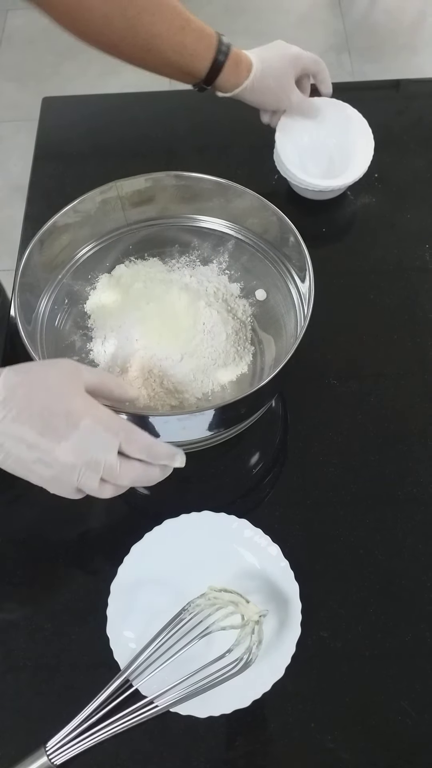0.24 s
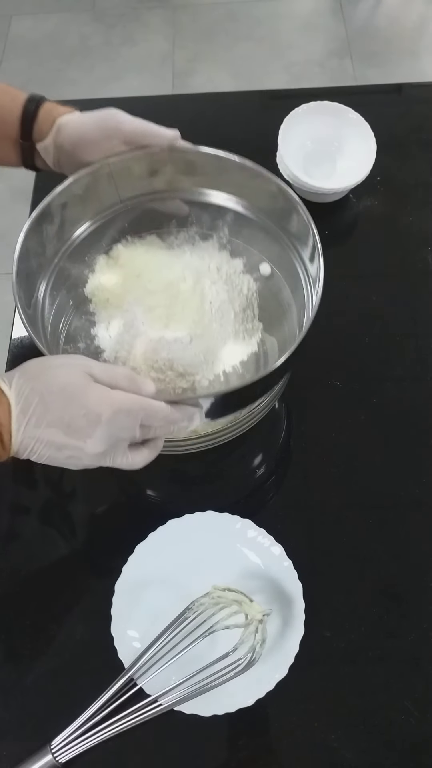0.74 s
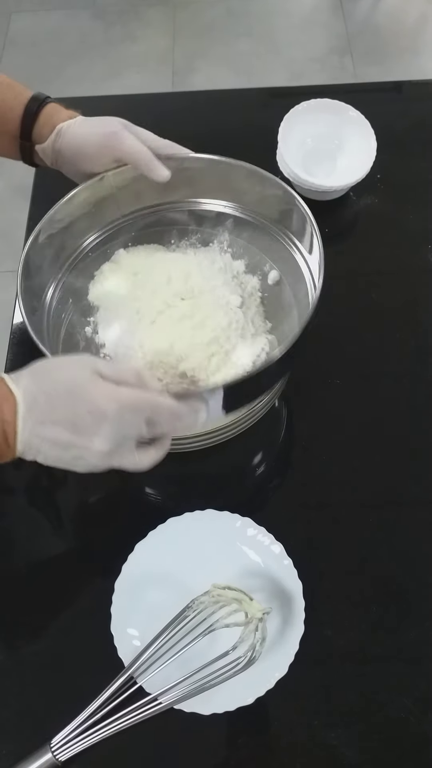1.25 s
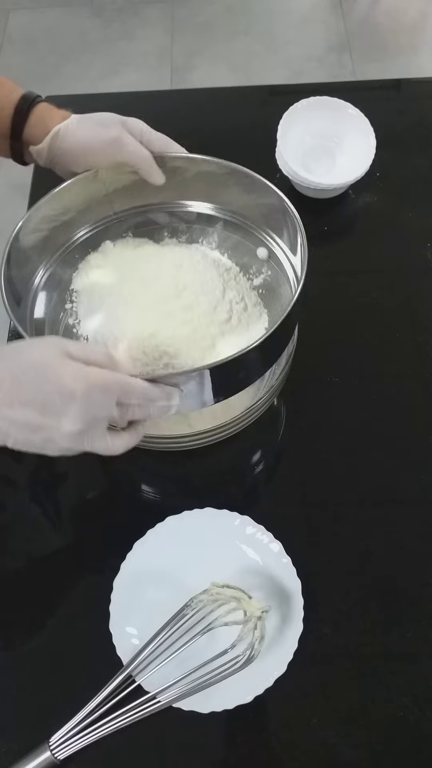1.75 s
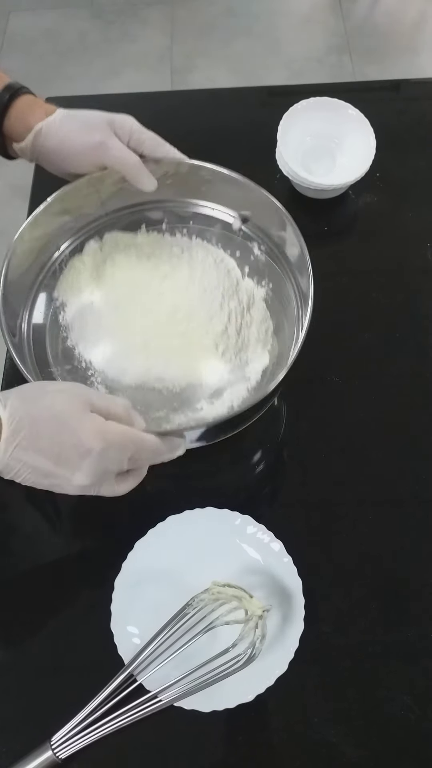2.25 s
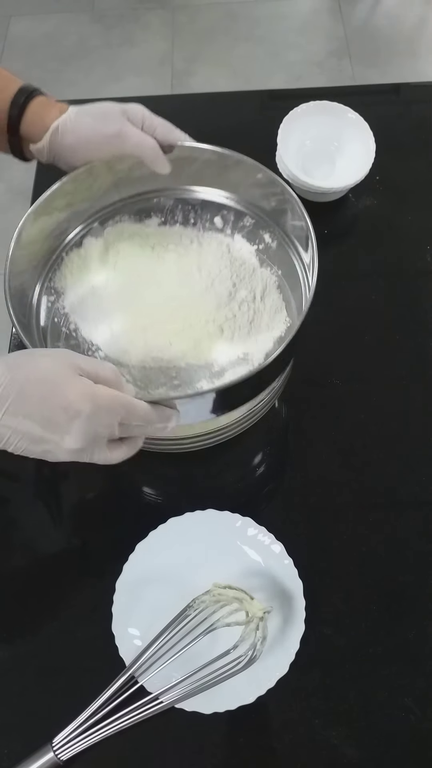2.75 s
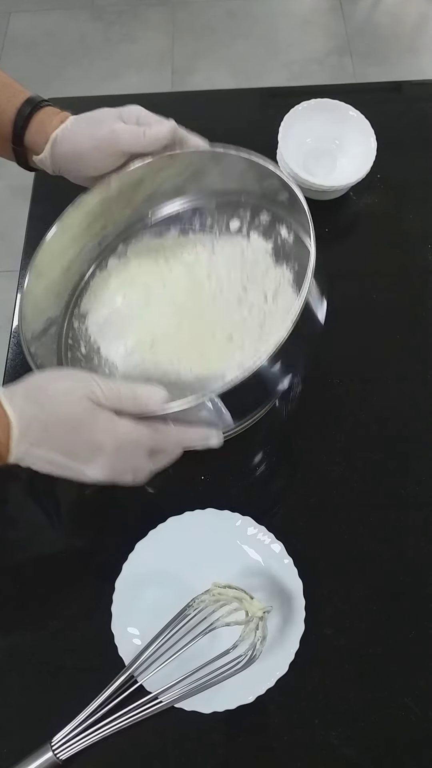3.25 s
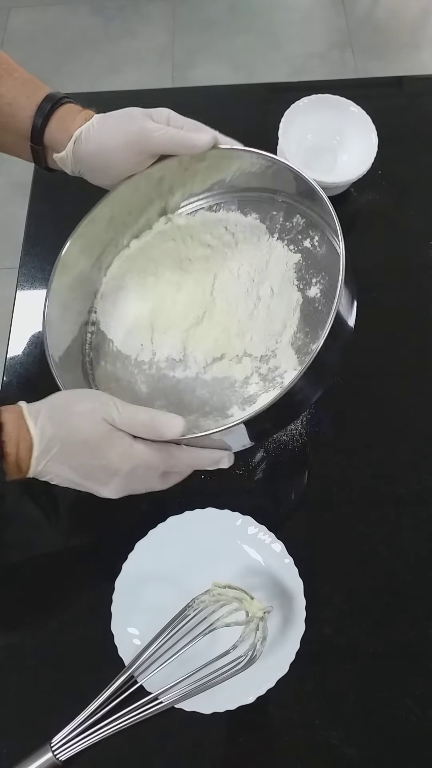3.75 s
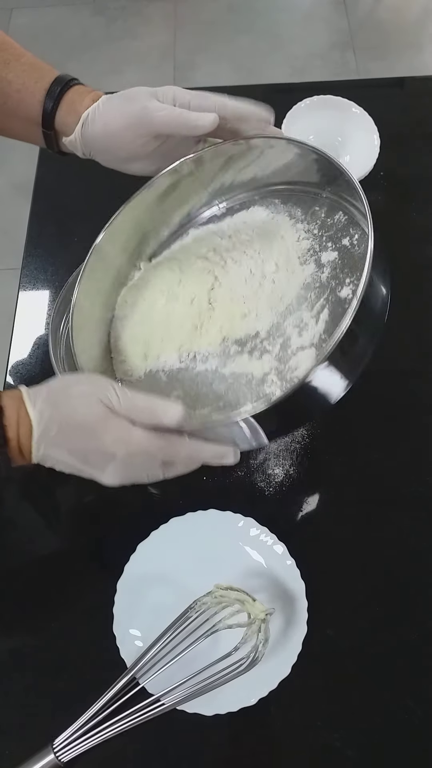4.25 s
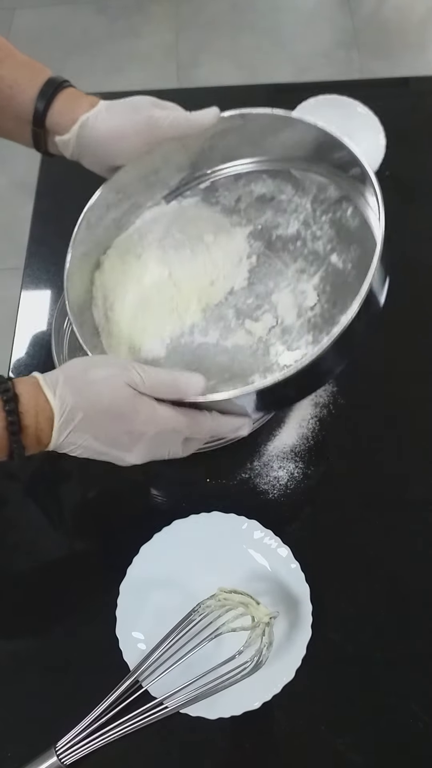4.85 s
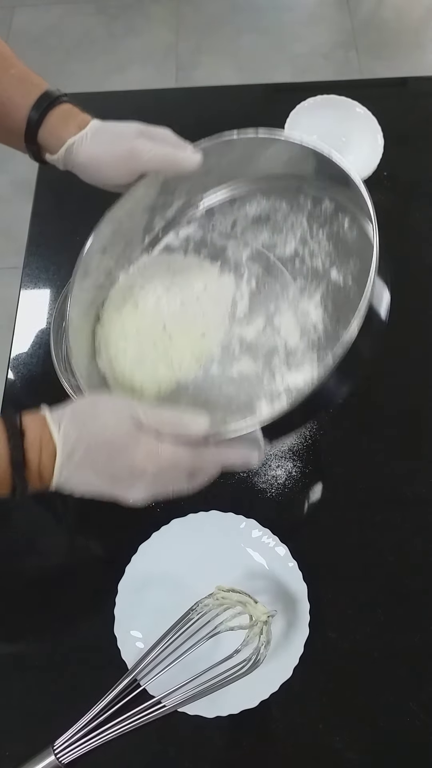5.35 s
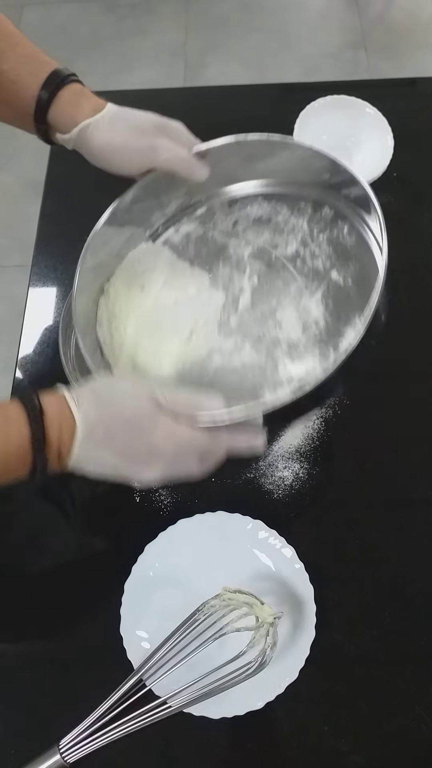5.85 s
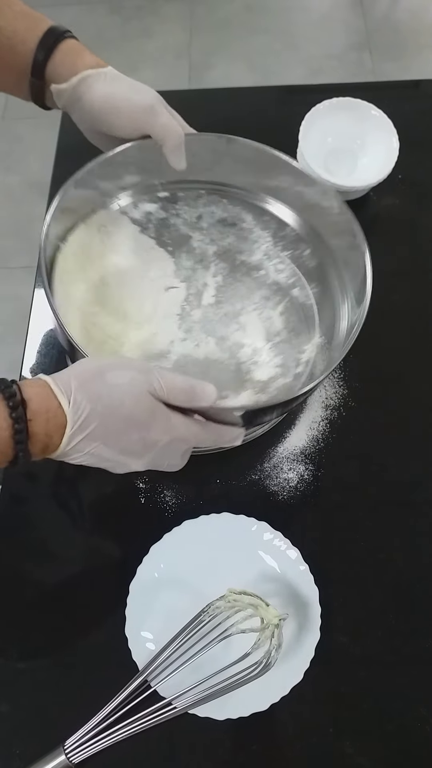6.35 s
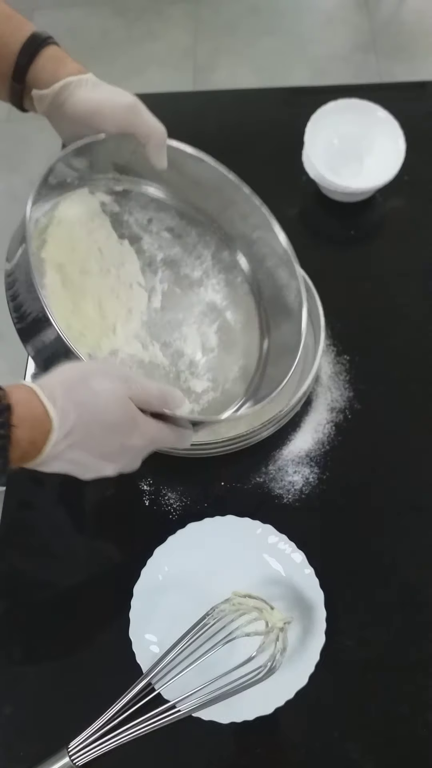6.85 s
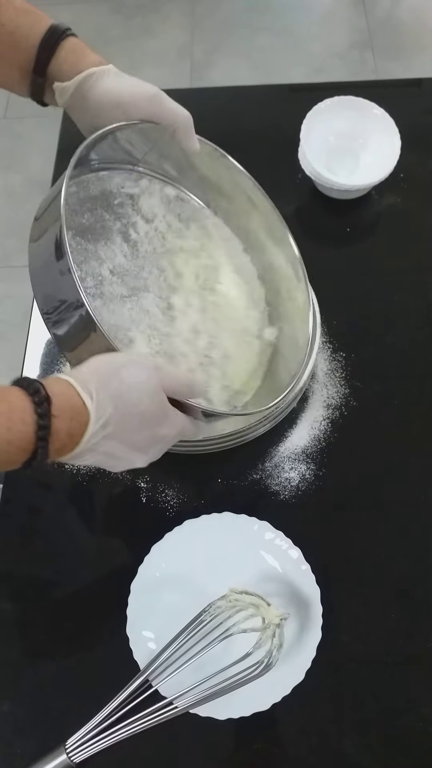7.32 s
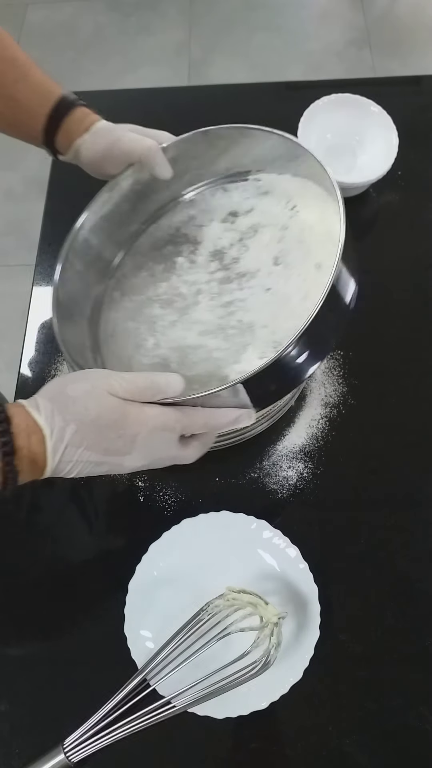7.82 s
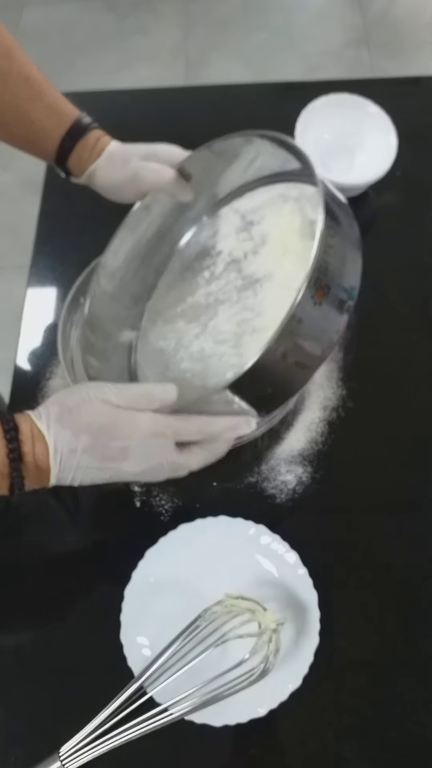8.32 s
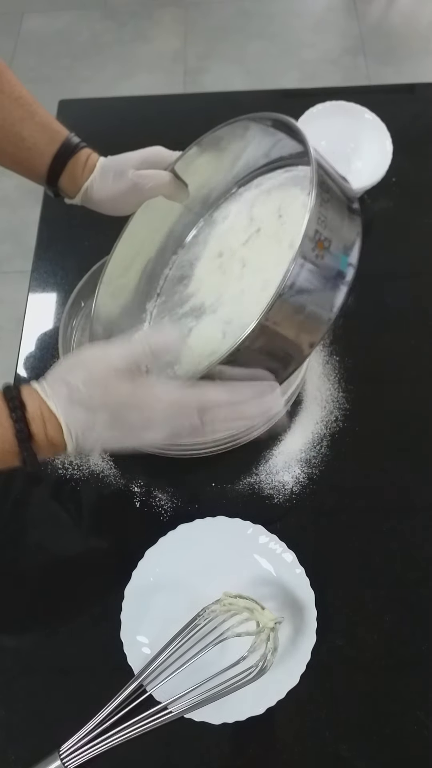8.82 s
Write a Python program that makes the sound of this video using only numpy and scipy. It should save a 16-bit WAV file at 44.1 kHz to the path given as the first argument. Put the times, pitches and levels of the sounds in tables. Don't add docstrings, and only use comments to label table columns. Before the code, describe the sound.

A small hard-walled kitchen, heard from about arm's length, with a faint low motor hum throughout. At 0.1 s the sieve clinks dully on the steel bowl; a glove rubs the rim until about 0.9 s, and a soft low clunk comes at 1.2 s. From 1.5 to 5 s powder swishes and hisses across fine mesh in quiet, irregular shakes with tiny dry flicks and ticks. From 5.3 to 6 s the shakes form an even, quick run, about eight a second. Around 6.5 s the rim chatters lightly in the fingers. At 7.04 and 7.11 s two loud, bright clangs ring the bowl, leaving a low swing; a smaller rim knock follows at 7.3 s. Light taps and a crisp slap come near 7.8 s, powder trickles, a knock lands at 8.4 s, then three hard metallic slaps at 8.7, 8.86 and 9.0 s.

```python
import sys
import numpy as np
from scipy import signal
from scipy.io import wavfile
from scipy.ndimage import uniform_filter1d

SR = 44100
rng = np.random.default_rng(int(sys.argv[2]) if len(sys.argv) > 2 else 0)


def file_out(sig):
    cols = np.atleast_2d(sig).T
    lim = np.clip(cols, -1, 1)
    pcm = np.round(lim * 32767).astype(np.int16)
    wavfile.write(sys.argv[1], SR, pcm)


def boost(x):
    u = np.asarray(x, float) / 20
    return 10 ** u


N = 400428

# hz, level_db (per Hz)
MESH_COLOUR = [(820, -28), (1400, -16), (1500, -18), (1730, -7), (2520, -9), (3340, 1), (3730, -6.5),
               (4480, -1), (5110, -5.5), (6710, -0.5), (9470, -18), (12400, -4.5), (15700, -1.5)]
# hz, level_db (per Hz)
WALL_COLOUR = [(350, -40), (600, -14.5), (824, -17.5), (1010, -11.5), (1160, -16), (1810, -10),
               (2590, -6.5), (3360, 0.5), (5230, -4), (6000, 0), (6890, -1), (7600, -9.5), (8300, -10),
               (9200, -7.5), (15600, 2), (16600, -22)]
QUIET_EDGE_HZ = 15850


def evened(x):
    return x / np.sqrt(np.mean(x ** 2) + 1e-20)


def read(points, hz):
    f, value = np.transpose(points)
    return np.interp(np.log(hz + 1), np.log(f + 1), value)


def add(mix, s, sound):
    part = mix[round(s * SR):][:len(sound)]
    part += sound[:len(part)]


def seconds(length_s):
    return np.arange(round(length_s * SR)) / SR


def coloured(x, gain_db):
    hz = abs(np.fft.fftfreq(4096, 1 / SR))
    log_gain = np.log(boost(np.maximum(gain_db(hz), -100)))
    taps = np.fft.ifft(np.exp(np.conj(signal.hilbert(log_gain)))).real[:2048]
    return signal.oaconvolve(x, taps)[:len(x)]


def resonate(x, hz, width):
    r = np.exp(-np.pi * width / SR)
    return 2 * signal.lfilter([1 - r], [1, -r * np.exp(2j * np.pi * hz / SR)], x).real


def drift(rate):
    steps = uniform_filter1d(rng.standard_normal(400), 3)
    return evened(np.interp(np.arange(N) / SR * rate, np.arange(400), steps))


def kitchen(x):
    # hz, t60_s
    decay = [(100, 0.99), (500, 0.62), (2000, 0.51), (3500, 0.36), (5000, 0.21), (9000, 0.13),
             (16000, 0.15)]
    taps = np.zeros(SR)
    at = np.arange(260, SR - 20, 12)
    at = at + rng.integers(0, 12, len(at))
    taps[at] = rng.choice([-1., 1.], at.shape)
    hz, t, z = signal.stft(taps, SR, nperseg=256)
    dying = boost(-60 * t / read(decay, hz)[:, None])
    tail = signal.istft(z * dying, SR, nperseg=256)[1]
    return signal.fftconvolve(x, tail / np.linalg.norm(tail))[:N]


def cooler():
    # hz, level_db (rms), waver_db
    motor = [(84.7, -69, -4), (175.3, -51.5, 0), (348.6, -58.5, 2), (528, -68.5, 2)]
    # hz, width_hz, level_db (rms)
    panels = [(346.9, 10.3, -59.5), (277, 6.3, -62), (206.3, 8.5, -72), (442.7, 11, -67.5),
              (498, 6.2, -68.5), (653.7, 16.6, -69.5), (2800, 160, -73.5), (3400, 250, -75.5)]
    # hz, level_db (per Hz)
    air_colour = [(25, -57), (68, -18.5), (130, -15.5), (220, -11), (350, -8.5), (420, -16.5), (650, -21.5),
                  (1150, -27.5), (1500, -38.5), (2300, -43), (3000, -37), (6900, -36.5), (8800, -49),
                  (12000, -39.5)]
    # time_s, gain_db
    held = [(0, -10), (.22, -8), (.4, 0), (7.0, -2), (7.2, -2.5), (8.3, -2), (8.6, -1.5)]
    t = np.arange(N) / SR
    orders, case = np.zeros((2, N))
    for hz, db, waver in motor:
        tone = np.sqrt(2) * np.sin(2 * np.pi * (hz * t + rng.random()))
        orders += boost(db + waver * drift(13)) * tone
    for hz, width, db in panels:
        stirred = resonate(resonate(rng.standard_normal(N), hz, width), hz, 2 * width)
        case += boost(db + 0.55 * drift(5.5)) * evened(stirred)
    air = evened(coloured(rng.standard_normal(N), lambda hz: read(air_colour, hz)))
    return boost(np.interp(t, *np.transpose(held))) * orders + case + boost(-54.5) * air


def slide(rows):
    # hz, level_db (per Hz)
    glove_colour = [(240, -38), (400, 7.5), (587, -1), (644, 4.5), (695, -4), (975, 2.5), (1230, -1.5),
                    (1800, 3.5), (2230, 2), (3430, 3.5), (6750, -8.5), (8760, -29), (15700, -8.5)]
    s, level_db, bright_db = np.transpose(rows)
    t = np.arange(s[0], s[-1], 1 / SR)
    rub = evened(coloured(rng.standard_normal(len(t)), lambda hz: read(glove_colour, hz)))
    dull = signal.lfilter(*signal.butter(2, 2200, fs=SR), rub)
    bright = boost(np.interp(t, s, bright_db))
    return s[0], boost(np.interp(t, s, level_db)) * (dull / bright + (rub - dull) * bright)


def glove_slides():
    # time_s, level_db, brightness_db (bright half up, dull half down)
    slides = [
        [(0.0, -45.5, -8), (0.062, -50.5, -6.5), (0.084, -43.5, -6), (0.16, -46.5, -3.5), (0.224, -42, -0.5),
         (0.306, -53, 0), (0.42, -68, 4.5)],
        [(0.5, -68, 1), (0.536, -53.5, -2.5), (0.6, -39, 2.5), (0.68, -42.5, 10.5), (0.752, -41.5, 5),
         (1.02, -77.5, 6.5)],
    ]
    glove = np.zeros(N)
    for rows in slides:
        add(glove, *slide(rows))
    return glove


def tick(s, peak_db, note_hz, fizz_db, ms=2.9):
    t = seconds(.04)
    click = coloured(rng.standard_normal(len(t)) * np.exp(-t / 0.00045),
                     lambda hz: read(MESH_COLOUR, hz) + 6 * (hz > 9000))
    scratch = 1 + 3.1 * uniform_filter1d(rng.standard_normal(len(t)), size=24)
    pair = np.sin(2 * np.pi * note_hz * t) + 0.46 * np.sin(2 * np.pi * 1.19 * note_hz * t)
    note = scratch * pair * np.exp(-t / (ms / 1000)) * (1 - np.exp(-t / 0.00025))
    return s, boost(peak_db) * (note + boost(fizz_db) * click / abs(click).max())


def chatter(s, peak_db, fizz_db):
    note_hz, ring_db, ring_s = 4600, -13, .009
    t = seconds(.1)
    ring = boost(peak_db + ring_db) * np.sin(2 * np.pi * note_hz * t) * np.exp(-t / ring_s)
    add(ring, 0, tick(s, peak_db, note_hz, fizz_db, ms=3.6)[1])
    return s, ring


def fingertips():
    # time_s, peak_db, note_hz, fizz_db
    ticks = [(.078, -43, 3400, 5), (.568, -47, 5500, 4), (1.163, -47, 2800, -20), (1.207, -48, 3750, -3),
             (1.296, -61, 6570, 22), (2.668, -47.5, 12800, 17), (2.668, -47, 5250, 13),
             (2.689, -40, 13100, 10), (3.422, -54, 4070, 8), (4.09, -47, 5000, 3), (4.117, -42, 3400, 5),
             (4.43, -52, 2980, 8), (6.386, -56, 11900, 22), (6.555, -34.5, 5500, -20),
             (7.015, -47, 1890, 4), (7.109, -15, 2080, 6), (7.108, -34, 14800, 0), (7.326, -38, 4600, -10),
             (7.616, -46, 2800, 1), (7.822, -41, 14500, 4), (7.835, -24, 14600, -5), (7.846, -34, 14800, 0),
             (7.934, -47, 13500, 2), (8.482, -47, 13500, 5), (8.665, -55, 12700, 8)]
    # time_s, peak_db, fizz_db
    chatters = [(6.456, -50, 26), (6.476, -44, 10), (6.52, -48, 8), (6.554, -37, 12), (6.595, -54, -5),
                (6.639, -43.5, -1), (6.766, -46, 4), (6.987, -56, 0), (7.021, -41.5, 15)]
    tips = np.zeros(N)
    for row in ticks:
        add(tips, *tick(*row))
    for row in chatters:
        add(tips, *chatter(*row))
    return tips


def slap(s, peak_db, note_hz, note_db, fizz_db):
    t = seconds(.5)
    noise = rng.standard_normal((2, len(t))) * (1 - np.exp(-t / 0.0017))
    grip = boost(2.04 * evened(uniform_filter1d(rng.standard_normal(len(t)), size=60)))
    contact = grip * np.exp(-t / 0.0038) + boost(-17.0 - 60 * t / 0.45)

    def wall_db(hz):
        note = note_db / (1 + ((hz - note_hz) / 900) ** 4)
        return read(WALL_COLOUR, hz) + note - 20 * (hz > 9000)

    def fizz_colour_db(hz):
        return read(WALL_COLOUR, hz) - 40 * (hz < 9000) - 5 * (hz < 10300)

    wall = coloured(noise[0] * contact, wall_db)
    fizz = coloured(noise[1] * (np.exp(-t / 0.0011) + boost(-28.5 - 60 * t / 0.35)), fizz_colour_db)
    push = np.sin(2 * np.pi * 110 * t) * np.exp(-t / 0.006)
    push += 1.2 * np.sin(2 * np.pi * 450 * t) * np.exp(-t / 0.003)
    thud = boost(-19.5) * (push - uniform_filter1d(push, 700))
    body = wall / abs(wall).max() + boost(fizz_db + 3) * fizz / abs(fizz).max() + thud
    return s, boost(peak_db - 1.5) * body


def palm_slaps():
    # time_s, peak_db, note_hz, note_db, fizz_db
    slaps = [(6.554, -38, 4800, -18, 10), (7.8245, -27, 5880, 14, -22), (7.831, -23.5, 7240, 13.5, -10),
             (7.838, -24, 5830, 20, -2), (8.1953, -39.5, 7000, 4, 13.5), (8.2811, -31, 3150, -2, -17),
             (8.3691, -20, 3000, 4.5, -17), (8.3758, -28.5, 3100, 5, -17), (8.512, -37.5, 3270, 2, -8),
             (8.518, -40, 3330, -1, -15), (8.6962, -13, 5960, 1, -3), (8.8597, -12, 3300, 0, -5),
             (9.0111, -15, 3520, -4, -9.5)]
    palm = np.zeros(N)
    for row in slaps:
        add(palm, *slap(*row))
    return palm


def belly(s, level_db):
    hz, t60_s, rise_s = 134.6, 1.55, 0.053
    t = seconds(1.8)
    return s, boost(level_db - 60 * t / t60_s) * np.sin(2 * np.pi * hz * t) * (1 - np.exp(-t / rise_s))


def clang(modes, s, ring_db, best_hz, reach, crack_db):
    t = seconds(.8)
    hz, db, t60 = np.transpose(modes)[:, :, None]

    def wander():
        knots = rng.standard_normal((len(hz), 80))
        return np.array([np.interp(t, np.linspace(0, .8, 80), k) for k in knots])

    level = 1 + .3 * wander()
    phase = .5 * hz / (hz + 1800) * wander()
    share_db = -6 * (np.log2(hz / best_hz) / reach) ** 2
    dying = boost(db + share_db - 10.5 - 60 * t / t60)
    ring = (dying * level * np.sin(2 * np.pi * hz * t + phase)).sum(0)
    ring *= 1 - np.exp(-t * (reach + 0.53) / 0.0016)

    def crack_colour_db(f):
        away = abs(np.log2((f + 50) / best_hz)) / reach
        return read(WALL_COLOUR, f) - 9 * away - 5 * (f > 8000)

    rattle = rng.standard_normal(len(t)) * (boost(-60 * t / 0.014) + boost(-17 - 60 * t / 0.43))
    crack = coloured(rattle * (1 - np.exp(-t * (reach + 0.14) / 0.002)), crack_colour_db)
    return s, boost(ring_db) * ring + boost(crack_db) * crack / abs(crack).max()


def struck_metal():
    low_hz, top_hz, fine_hz = [176, 395, 340, 427, 466, 523, 568, 590, 787, 840, 923, 1003, 1142, 1262,
                               1796, 1814, 1840], [2100, 2643, 2940, 3440, 3656, 3680, 4480, 5640, 6900, 7120], [619, 759, 1200, 1350, 2234, 2821, 3149,
                                                                     3962, 4247, 4790, 5103, 5303, 6050,
                                                                     6627, 7424, 7693, 10500, 12200, 14100]
    # level_db, t60_s
    main_ring, fine_ring = [(-3.5, 0.78), (-9.5, 0.88), (-10, 0.37), (-3.5, 0.65), (1, 0.57), (5.5, 0.077),
                            (6.5, 0.22), (-11.5, 0.23), (-12, 0.54), (-16, 0.63), (-11.5, 0.49),
                            (-11, 0.22), (-4.5, 0.13), (-12.5, 0.31), (-5.5, 0.44), (-3, 0.26), (-4, 0.18),
                            (-5, 0.18), (3, 0.074), (-3, 0.12), (2, 0.078), (2, 0.27), (-1, 0.121),
                            (-17, 0.3), (-3.5, 0.16), (-4, 0.23), (-10, 0.11)], [(-12.5, 0.35), (-9, 0.4), (-10, 0.17), (-8.5, 0.23), (-15, 0.12),
                                          (-13.5, 0.206), (-21, .3), (-18, 0.15), (-23, 0.2), (-10.5, 0.41),
                                          (-15, 0.21), (-11, 0.12), (-19, 0.22), (-19, .15), (-10, .2),
                                          (-2, 0.24), (-13, 0.17), (-3, 0.16), (-4, .2)]
    rim_hz = [1066, 1295, 1512, 1667, 1717, 1740, 2445, 2575, 3036, 3205, 3300, 4370, 4540]
    # level_db, t60_s
    rim_ring = [(-1, 0.17), (-17, 0.2), (6.5, 0.096), (-5.5, 0.4), (-4, 0.38), (2.5, 0.34), (-33, 0.43),
                (-8.5, 0.18), (-7, 0.2), (4.5, 0.097), (-4, 0.17), (-23, 0.22), (-26, 0.31)]
    # time_s, ring_db, best_hz, reach_octaves, crack_db
    clangs = [(.003, -57, 6950, 0.37, -55), (.066, -22.5, 800, 0.32, -31.5), (.085, -28, 940, 0.41, -37),
              (.14, -59, 497, 0.61, -53), (1.169, -31.5, 485, 0.28, -39.5), (1.173, -35.5, 1130, 0.49, -42),
              (7.04, -10, 1270, 1.86, -8.5), (7.062, -20, 1070, 0.45, -10), (7.108, -8.5, 1370, 2.1, -4.5),
              (7.135, -21, 990, 2, -35), (7.288, -27, 3600, .15, -45), (7.713, -36, 800, 0.44, -35),
              (7.719, -33.5, 1100, 0.77, -31.5), (7.745, -52, 1500, 0.73, -39)]
    # time_s, ring_db, best_hz, reach_octaves, crack_db
    rim_hits = [(0.002, -42.5, 2010, 2.3, -61.5), (3.419, -60, 1810, 0.39, -51),
                (7.287, -19.5, 1860, 1.2, -21), (8.283, -40, 3600, 0.72, -58),
                (8.37, -25.5, 2950, 0.41, -31), (8.372, -37, 1380, 0.22, -41),
                (8.513, -41, 3200, 0.56, -60), (8.699, -27, 3300, 0.71, -35), (8.86, -34, 3300, 0.85, -46),
                (9.014, -34, 3300, 0.71, -38)]
    # time_s, level_db
    belly_blows = [
        (1.17, -43.5),
        (7.04, -25),
    ]
    bowl = np.column_stack([low_hz + top_hz + fine_hz, main_ring + fine_ring])
    rim = np.column_stack([rim_hz, rim_ring])
    metal = np.zeros(N)
    for row in clangs:
        add(metal, *clang(bowl, *row))
    for row in rim_hits:
        add(metal, *clang(rim, *row))
    for row in belly_blows:
        add(metal, *belly(*row))
    return metal


def surge(rows, t):
    rise_share, fall_share = 0.38, 0.44
    s, flow_db, length = np.transpose(rows)[:3, :, None]
    late = (t - s) / length
    return flow_db - 6 * np.where(late < 0, (late / rise_share) ** 2, abs(late) / fall_share)


def run_of_shakes():
    run_db = [-59, -54.5, -51.5, -51.5, -52.5, -52]
    start_s, period_s, length_s = 5.362, .1258, 0.11
    return [(start_s + k * period_s, db, length_s, 16 - k) for k, db in enumerate(run_db)]


def flow():
    # peak_s, flow_db, length_s, coarseness_db (towards 2 kHz)
    shakes = [(.46, -58.5, .12, 18), (.55, -54.5, 0.17, 0), (1.17, -59, 0.14, 0), (1.84, -56, 0.15, 21),
              (1.92, -56, 0.046, 19), (2.04, -50, 0.088, 12), (2.322, -50, .055, 12),
              (2.44, -58, 0.16, 20.5), (2.65, -52, 0.096, 13), (2.735, -50, 0.16, 15.5),
              (3.428, -49.5, 0.033, 14), (3.47, -56.5, 0.092, 22.5), (3.62, -60, 0.053, 20),
              (4.05, -50, 0.062, -2), (4.11, -51, 0.065, 15), (4.185, -50, 0.096, 13),
              (4.44, -52.5, 0.091, 13), (4.6, -61, 0.15, 21.5), (5.23, -49.5, 0.079, -2),
              (6.15, -59.5, 0.052, -6), (6.58, -51, 0.088, -15), (6.66, -53.5, 0.062, 0),
              (6.78, -55, 0.029, 0), (6.93, -67, .1, 24)]
    # peak_s, flow_db
    flicks = [(1.05, -66), (1.3, -64), (1.47, -60), (1.64, -71), (1.73, -62), (2.88, -66), (3.04, -65),
              (3.197, -60), (3.214, -58), (3.26, -61), (3.34, -63), (3.37, -57.5), (3.74, -55.5),
              (3.82, -64), (3.88, -56), (3.93, -56), (3.99, -54.5), (4.27, -61), (4.5, -55.5), (5.075, -61),
              (6.34, -62), (8.08, -67)]
    # time_s, flow_db, coarseness_db
    trickle = [(.9, -83, -11), (1.25, -67.5, 14), (2.1, -60, 11), (2.2, -67, 11), (2.8, -66.5, 4),
               (4.2, -59, -3), (4.7, -84, 2), (5.15, -87, 0), (5.3, -59.5, 13), (6.05, -60, 8),
               (6.3, -63.5, -10), (7.03, -57.5, 3.5), (7.5, -64, -11), (7.62, -60, 30.5), (8.12, -73, -10),
               (8.2, -56.5, -8), (8.45, -54.5, 0), (8.65, -62.5, -3)]
    flick_s = 0.041
    t = np.arange(0, N / SR, .002)
    rows = shakes + run_of_shakes()
    shake_db = surge(rows, t)
    coarse_db = np.transpose(rows)[3][:, None]
    flick = (boost(surge([(s, db, flick_s) for s, db in flicks], t)) ** 2).sum(0)
    at, thin_db, grit_db = np.transpose(trickle)
    thin_db = np.interp(t, at, thin_db)
    grit_db = np.interp(t, at, grit_db)
    fine = (boost(shake_db) ** 2).sum(0) + boost(thin_db) ** 2 + flick
    coarse = (boost(shake_db + coarse_db) ** 2).sum(0) + boost(thin_db + grit_db) ** 2
    return [np.interp(np.arange(N) / SR, t, np.sqrt(power)) for power in (fine, coarse, flick)]


def powder():
    ping_hz, ping_width_hz, grains_per_s = 6260, 1900, 12000
    sizes = boost(1.7 * np.minimum(rng.exponential(1, (2, N)), 4))
    grains = rng.standard_normal((2, N)) * sizes * (rng.random((2, N)) < grains_per_s / SR)
    fine = evened(coloured(grains[0], lambda hz: read(MESH_COLOUR, hz) - 30 * (hz < 1200)))
    lumps = evened(resonate(resonate(grains[1], 2030, 2400), 2030, 2400))
    pings = evened(resonate(resonate(grains[1], ping_hz, ping_width_hz), ping_hz, ping_width_hz))
    dust, grit, flick = flow()
    unrest = boost(.7 * drift(40))
    return unrest * (boost(1.0) * dust * fine + boost(-28.0) * grit * lumps + boost(-6) * flick * pings)


def scene():
    sift, hum, glove = powder(), cooler(), glove_slides()
    metal, palm, tips = struck_metal(), palm_slaps(), fingertips()
    blows = boost(-8) * metal + boost(-9) * palm + boost(-9) * tips
    sent = blows + boost(-12.5) * glove + boost(-10.0) * sift
    echo = kitchen(coloured(sent, lambda hz: -11 * (hz > 9000) - 8 * (hz < 160)))
    steady = coloured(glove + sift + echo + hum, lambda hz: -50 * (hz > QUIET_EDGE_HZ))
    near = signal.sosfilt(signal.butter(4, 70, "high", fs=SR, output="sos"), metal + palm + tips)
    return (near + steady)[None]


def halved_top(x):
    gate_db = -57
    low_pass = signal.firwin(1023, QUIET_EDGE_HZ - 60, window=("kaiser", 8), fs=SR)[None]
    top = x - signal.oaconvolve(x, low_pass, "same")
    level_db = 10 * np.log10(abs(uniform_filter1d(top ** 2, size=400)) + 1e-14)
    is_open = uniform_filter1d(1. * (level_db > gate_db), size=200)
    return x - top * (1.5 - is_open)


def top_cut(x):
    return signal.sosfilt(signal.butter(12, 17000, fs=SR, output="sos"), x)


def record(dry):
    # hz, gain_db
    port = [(7400, 0.5), (8100, -7), (9800, -7), (10300, -3.5)]
    thin = signal.sosfilt(signal.butter(3, 45, "high", fs=SR, output="sos"), dry)
    thin = coloured(thin[0], lambda hz: read(port, hz))[None]
    power_db = 10 * np.log10(abs(uniform_filter1d(thin[0] ** 2, 2000)) + 1e-12)
    fall = np.arange(N) * 4.5 / SR
    over_db = np.maximum(np.maximum.accumulate(power_db + fall) - fall + 22.5, 0)
    ducked = thin / boost(0.17 * uniform_filter1d(over_db, 1500, origin=700))
    rounded = 1.1 * np.tanh(ducked / 1.1)
    band_limit = signal.firwin(255, 16700, window=("kaiser", 9), fs=SR)[None]
    limited = signal.oaconvolve(rounded, band_limit, "same")
    return top_cut(halved_top(limited))


dry = scene()
out = record(dry)
file_out(out)
```